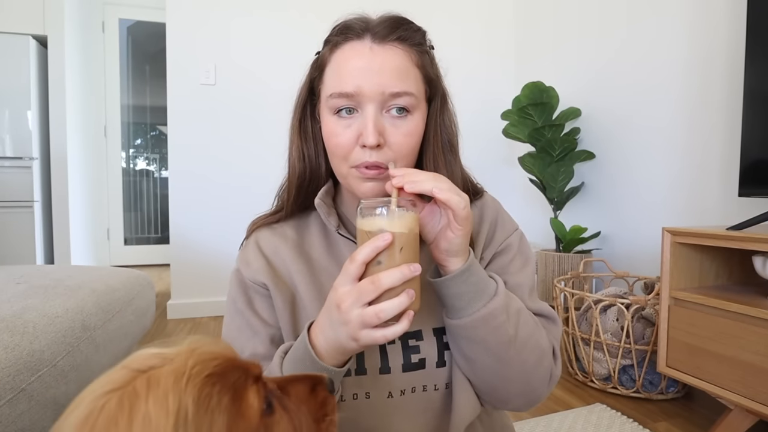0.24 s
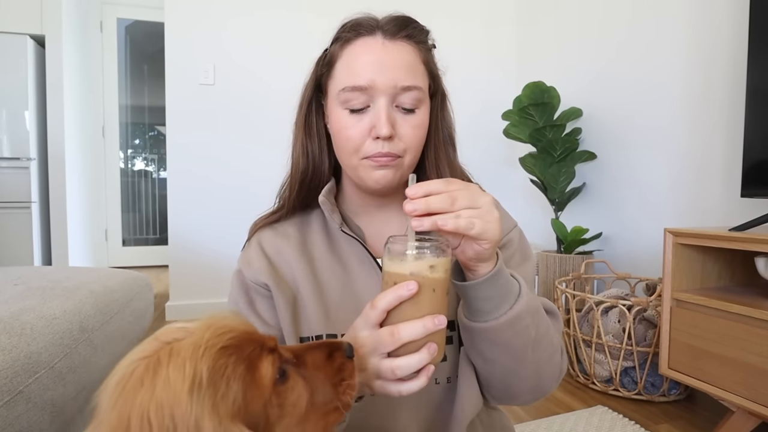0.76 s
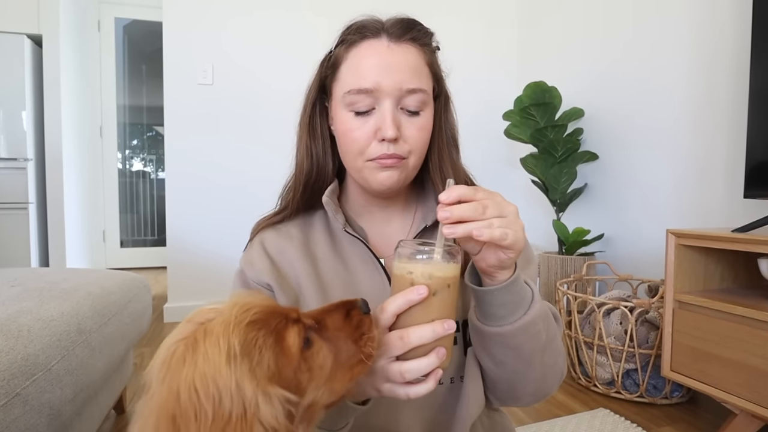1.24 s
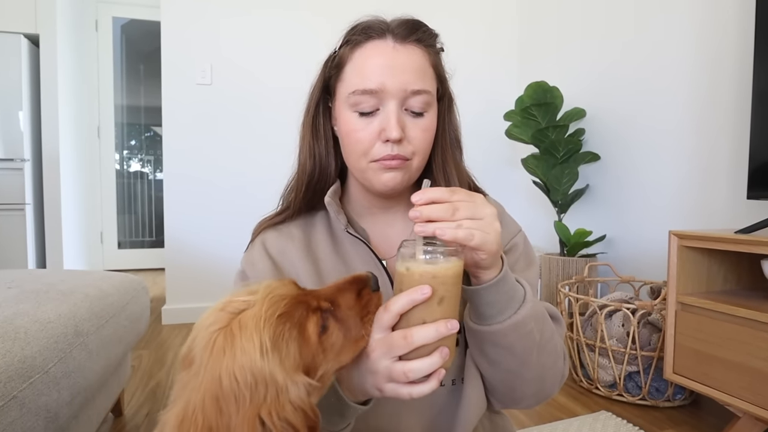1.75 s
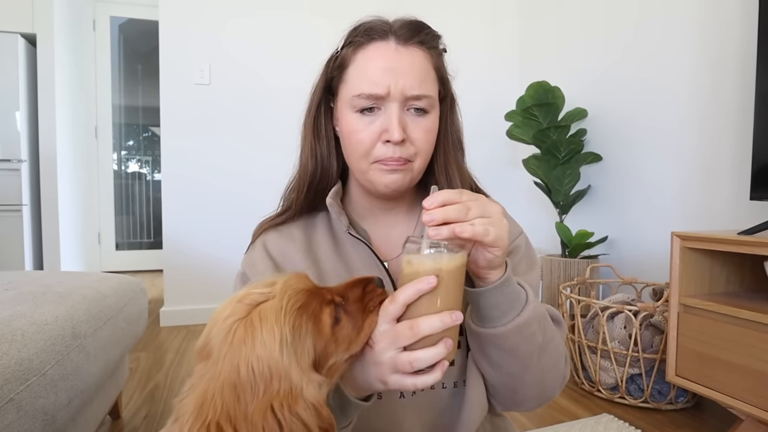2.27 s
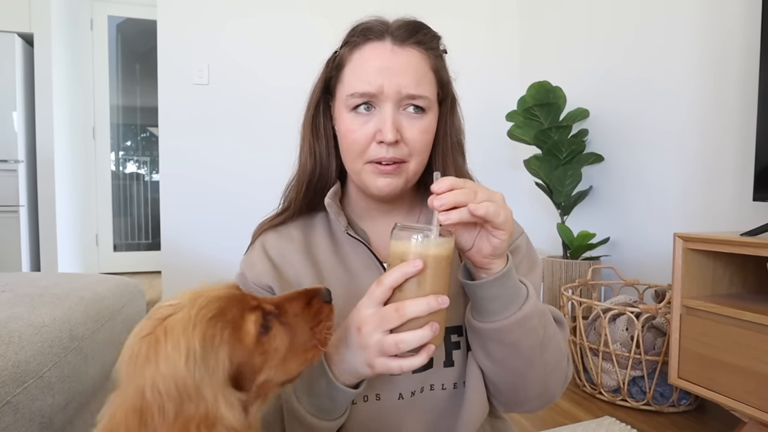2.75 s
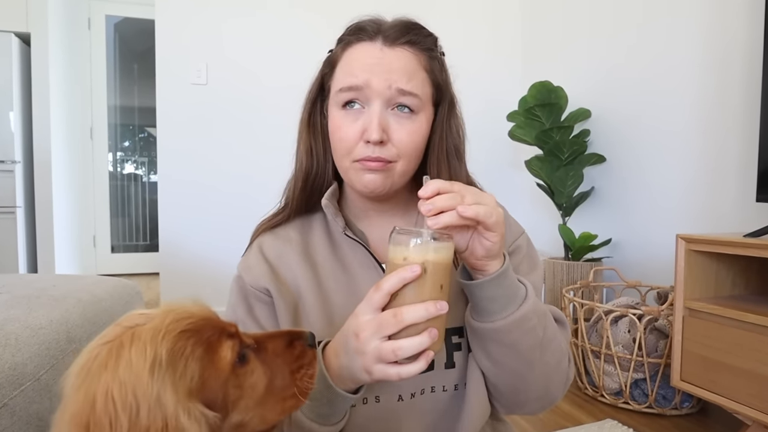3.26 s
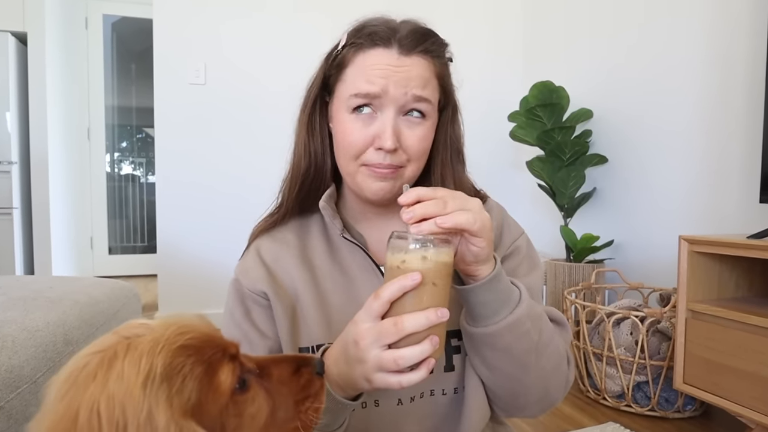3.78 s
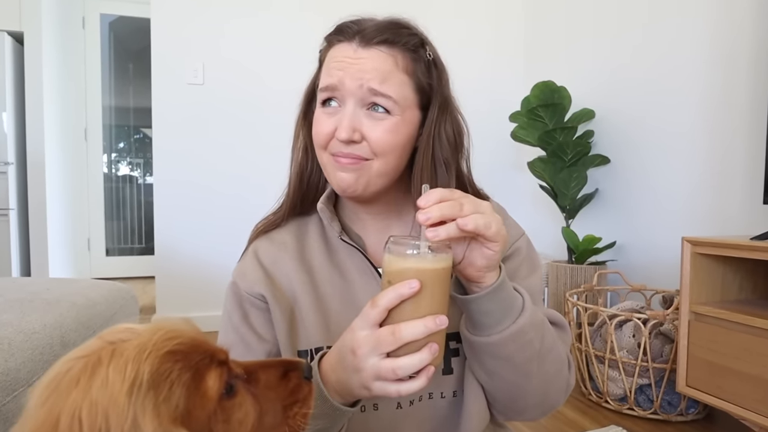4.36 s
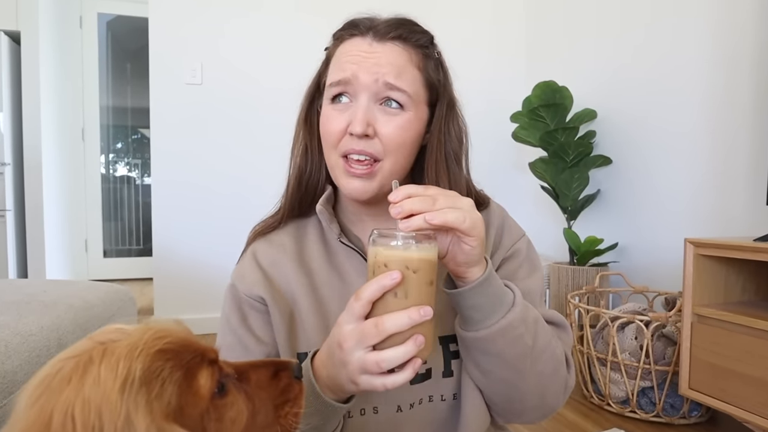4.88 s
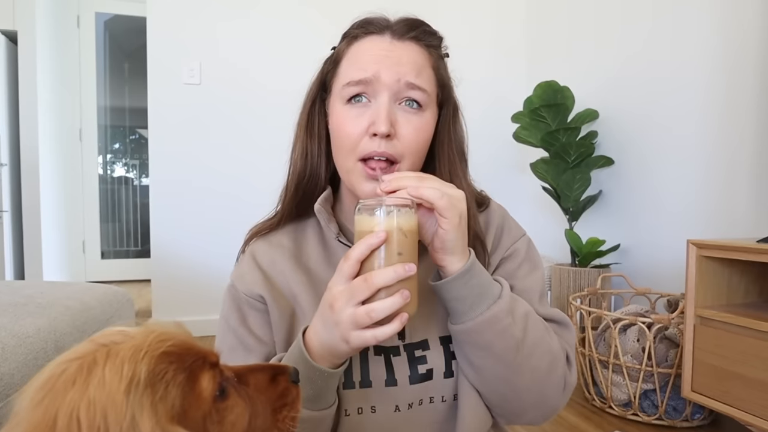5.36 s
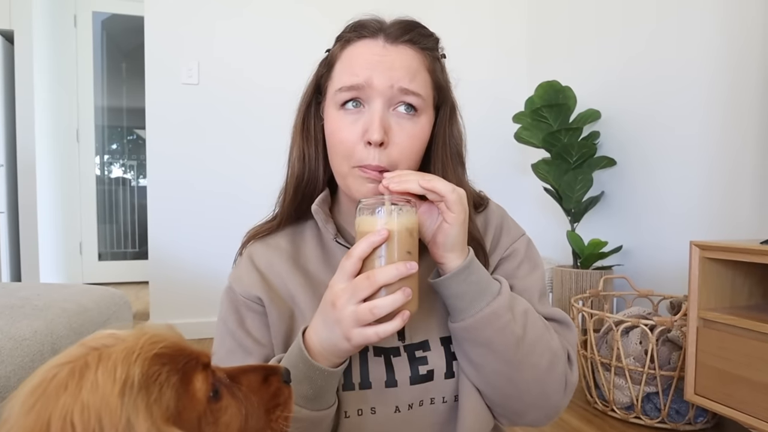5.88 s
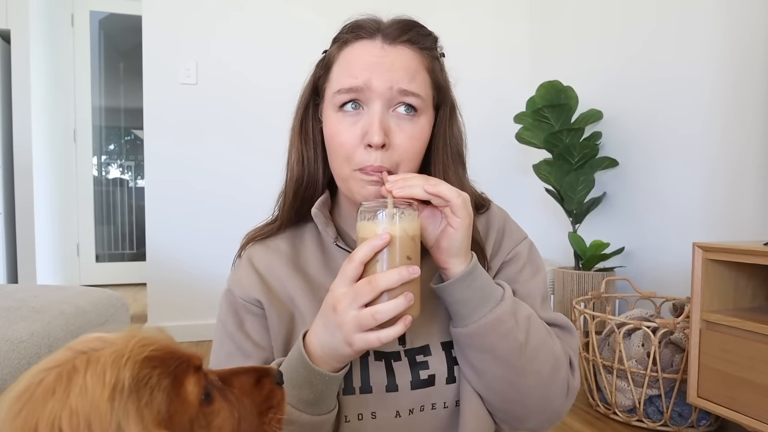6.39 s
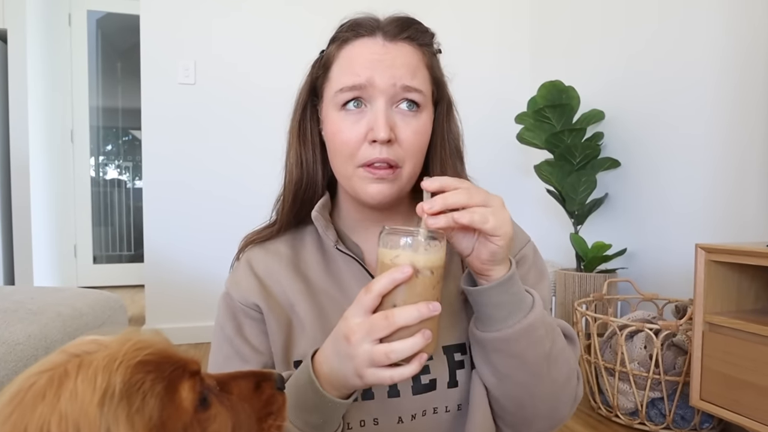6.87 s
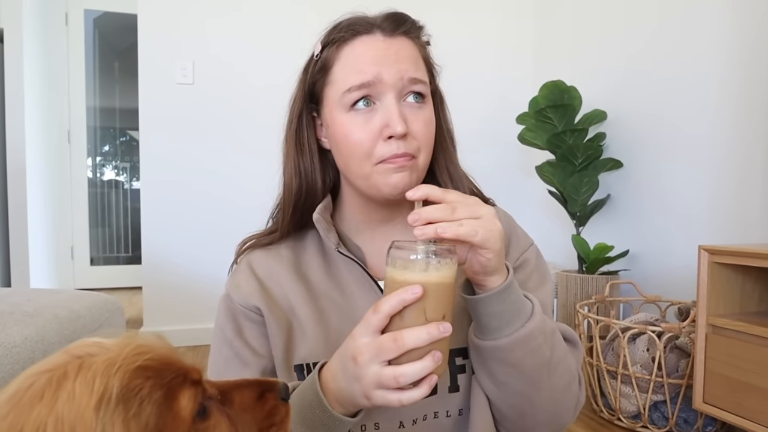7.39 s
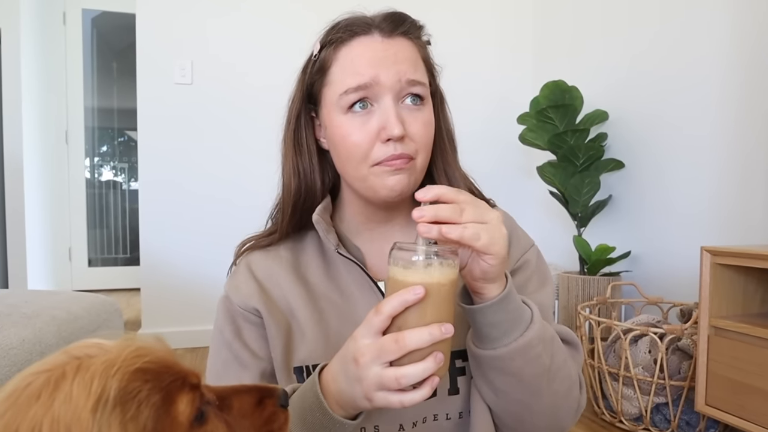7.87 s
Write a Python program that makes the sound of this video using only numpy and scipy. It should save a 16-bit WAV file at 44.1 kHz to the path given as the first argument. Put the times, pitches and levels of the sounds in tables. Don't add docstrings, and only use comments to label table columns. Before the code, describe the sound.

In a quiet living room, an iced drink is stirred close to the microphones. Cubes knock the glass and one another with short bright cracks over a dull, quickly damped ring, while little ticks and slides fill the gaps. The stirring is busy until nearly five seconds, almost stops, then returns in lively bursts. Now and then one clear note rings out. Soft air hiss, a faint far motor hum and one gentle paw step lie underneath.

```python
import sys
import numpy as np
from scipy import signal
from scipy.fft import rfft, irfft, next_fast_len
from scipy.io import wavfile

SR = 44100
rng = np.random.default_rng(int(sys.argv[2]) if len(sys.argv) > 2 else 0)


def boost_factor(decibels):
    exponent = np.asarray(decibels, float) / 20
    return 10 ** exponent


def transcribe(signal):
    frames = np.atleast_2d(signal).T
    limited = np.clip(frames, -1, 1)
    pcm = np.round(limited * 32767).astype(np.int16)
    wavfile.write(sys.argv[1], SR, pcm)


N = 358647


def rms_one(x):
    return x / np.sqrt(np.mean(x ** 2) + 1e-20)


def in_time(rows):
    s, *columns = np.transpose(rows)
    return [np.interp(np.arange(N) / SR, s, c) for c in columns]


def at_hz(points, hz):
    point_hz, value = np.array(points).T
    return np.interp(np.log(hz + 1e-9), np.log(point_hz), value)


def add(out, times, sounds):
    for s, sound in zip(times, sounds):
        i = max(round(s * SR), 0)
        out[..., i:i + sound.shape[-1]] += sound[..., :N - i]
    return out


def struck(hz, t60, rise_s, size=2600):
    t = np.arange(size) / SR
    onset = (1 - np.exp(-t / rise_s)) ** 2
    shape = onset * boost_factor(-60 * t / np.abs(t60)[..., None])
    sine = np.sin(2 * np.pi * np.minimum(hz, .45 * SR)[..., None] * t)
    return shape * sine / shape.max(-1, keepdims=True)


def cluster(modes, luck, cycles, rise_s, tilt_db=0):
    hz, db = np.transpose(modes)
    strength, detune, damp = np.split(luck, 3, axis=1)
    hz = hz * np.exp(0.049 * detune)
    rings = struck(hz, cycles / hz * np.exp(.3 * damp), rise_s, size=1400)
    signed = boost_factor(db + tilt_db + 2.3 * strength) * np.sign(detune)
    sound = (signed[..., None] * rings).sum(1)
    return sound / np.abs(sound).max(-1, keepdims=True)


# (frequency [Hz], density [dB per Hz])
AIR = [(20, -15), (171, -4), (382, -5), (700, -11), (2270, -15), (5850, -26.5), (11400, -36.5),
       (15500, -40)]
# (frequency [Hz], left-right correlation [-1..1])
LIKENESS = [(60, 1), (180, 0.18), (550, -0.12), (1650, -0.94), (4970, -0.88), (15000, 0.022)]
AIR_DB = -46


def air():
    size = next_fast_len(N)
    hz = np.arange(size // 2 + 1) * SR / size
    alike = np.clip(at_hz(LIKENESS, hz), -.9, .99)
    mid, side = rfft(rng.standard_normal((2, size)))
    both = np.sqrt(1 + alike) * mid + np.sqrt(1 - alike) * side * [[1], [-1]]
    shaped = both * boost_factor(at_hz(AIR, hz)) * (hz > 15)
    return boost_factor(AIR_DB) * rms_one(irfft(shaped, size)[:, :N])


# (time [s], level [dB])
HUM = [
    (0.0, -62),
    (2.35, -48.5),
    (2.47, -56.5),
    (4.94, -61),
    (6.41, -67.5),
    (6.97, -49.5),
    (7.38, -62.5),
    (8.06, -52.5),
]


def hum(hz=72, width_hz=4.2):
    sos = signal.butter(2, [hz - width_hz, hz + width_hz], "band", fs=SR, output="sos")
    return boost_factor(in_time(HUM)[0] - 3) * rms_one(signal.sosfilt(sos, rng.standard_normal(N)))


# (time of most motion [s], level [dB], settling [dB per s])
PUSHES = [(.38, -38.5, 123), (.64, -39.5, 43), (.97, -39, 61), (1.19, -32, 121), (1.4, -37, 122),
          (1.54, -39.5, 9), (1.84, -45, 151), (2.098, -35, 175.5), (2.37, -32.5, 82.5), (2.6, -44, 66),
          (2.73, -43.5, 68), (2.953, -33.5, 77), (3.12, -44.5, 65), (3.428, -30.5, 189),
          (3.68, -39.5, 51.5), (3.8, -34, 68.5), (3.998, -36, 150), (4.219, -35, 110), (4.4, -41, 133),
          (4.56, -33.5, 34), (6.742, -48, 0), (7.0, -44.5, 46), (7.22, -33, 54), (7.57, -41.5, 60),
          (7.941, -36, 18), (8.13, -25, 41)]
PUSH_DB_PER_S, DRIFT_DB = 214.5, -56.5


def motion_db():
    t = np.arange(0, N / SR + .01, .002)
    s, db, settle = np.transpose(PUSHES)[:, :, None]
    fall_db = np.where(t < s, PUSH_DB_PER_S * (s - t), np.abs(settle) * (t - s))
    power = boost_factor(DRIFT_DB) ** 2 + (boost_factor(db - fall_db) ** 2).sum(0)
    return np.interp(np.arange(N) / SR, t, 10 * np.log10(power))


def ticks(modes, dealt, clicks, cycles, colour_db):
    places = dealt.max() + 1
    luck = rng.standard_normal((places, 3 * len(modes))) * colour_db
    rings = cluster(modes, luck, cycles, rise_s=0.00047)
    return rms_one(sum(signal.oaconvolve(clicks * (dealt == k), ring)[:N] for k, ring in enumerate(rings)))


# (frequency [Hz], level [dB])
GLASS = [(640, -23), (790, -7), (930, -5), (1050, -10), (1320, -1), (1550, 1), (1740, -2.5)]
# (frequency [Hz], level [dB])
ICE = [(2150, -16), (2550, -2.5), (3000, -3.5), (3350, 0.5), (3750, -3.5), (4300, -6), (4800, 0),
       (5400, -4), (6100, -3), (7100, -1.5)]


def jostle(per_s=300, size_db=3.0, clumping_db=4.0):
    busy = np.interp(np.arange(N), np.linspace(0, N, num=500), rng.standard_normal(500))
    born = rng.random(N) < per_s * boost_factor(clumping_db * busy) / SR
    clicks = born * boost_factor(size_db * np.minimum(rng.exponential(1, N), 4))
    dealt = rng.integers(0, 14, N)
    dull = ticks(GLASS, dealt, clicks, cycles=17.6, colour_db=1.88)
    ice = ICE + [(9000, 2.0), (11000, 9.7)]
    bright = ticks(ice, dealt, clicks * boost_factor(rng.normal(0, 4.2, N)), cycles=30.0, colour_db=1.88)
    blunt = signal.butter(2, 4500, fs=SR, output="sos")
    bright = signal.sosfilt(blunt, bright)
    return boost_factor(motion_db() - 3.0) * (dull + bright)


# (time [s], peak level [dB], loudest frequency [Hz])
NUDGES = [(0.32, -34, 4460), (0.333, -32, 1530), (0.3564, -36, 1650), (0.369, -54, 1220),
          (0.3804, -32, 1630), (0.397, -34, 3500), (0.4226, -33, 1450), (0.5614, -33.5, 1730),
          (0.614, -29, 1590), (0.6402, -29.5, 1540), (0.7058, -21.5, 1277), (0.716, -24.5, 1650),
          (0.7813, -22.5, 1450), (0.8023, -23.5, 1390), (0.8931, -42.5, 2430), (0.939, -30.5, 2860),
          (0.963, -20, 3370), (1.0146, -28, 3510), (1.034, -28, 2100), (1.0481, -31.5, 1000),
          (1.066, -31.5, 3430), (1.106, -28.5, 1430), (1.122, -28, 3410), (1.2166, -23, 1600),
          (1.2541, -32.5, 967), (1.2809, -26, 1520), (1.3515, -40, 1610), (1.387, -30, 1240),
          (1.394, -27, 1320), (1.5449, -19.5, 2240), (1.5987, -24.5, 1760), (1.6643, -30, 1960),
          (1.673, -36, 1090), (1.692, -25, 1420), (1.706, -27.5, 2500), (1.753, -23.5, 2620),
          (1.7753, -23.5, 1440), (1.8484, -30.5, 1340), (2.007, -17, 1570), (2.0285, -23, 1380),
          (2.0332, -22.5, 1500), (2.066, -20, 1240), (2.0844, -23.5, 2570), (2.263, -32.5, 2520),
          (2.282, -24, 1325), (2.2933, -21, 1510), (2.321, -20.5, 1510), (2.341, -31, 1530),
          (2.3856, -20.5, 2430), (2.3976, -19, 1217), (2.4367, -37, 3610), (2.4535, -36, 4950),
          (2.5765, -41, 1740), (2.583, -20.5, 1660), (2.6627, -29, 1580), (2.7046, -24.5, 3520),
                 (2.711, -22, 1580), (2.7236, -23, 5380), (2.7612, -27, 1880), (2.8557, -38.5, 910),
                 (2.8881, -28, 1620), (2.9225, -37, 1610), (2.9293, -34, 990), (2.9674, -29.5, 1240),
                 (2.977, -19, 1320), (3.01, -22, 3370), (3.0563, -21, 1290), (3.0678, -20, 1750),
                 (3.1337, -21, 1630), (3.153, -26, 1600), (3.2257, -31, 3600), (3.266, -42, 1350),
                 (3.2732, -37, 940), (3.361, -22, 1680), (3.383, -22.5, 1350), (3.4245, -17, 1400),
                 (3.42, -16, 5270), (3.4647, -32, 1520), (3.4778, -32, 2310), (3.595, -25, 3500),
                 (3.64, -26, 5030), (3.6954, -24, 1250), (3.6994, -26.5, 2900), (3.756, -36, 1600),
                 (3.766, -37, 1270), (3.7977, -18.5, 1250), (3.8649, -29, 3600), (3.9266, -26, 1570),
                 (3.9388, -19, 1500), (3.9514, -16, 2470), (3.986, -18, 1610), (4.0133, -17.5, 1580),
                 (4.166, -24, 1220), (4.213, -45, 1660), (4.253, -27.5, 1510), (4.3122, -30, 860),
                 (4.346, -30, 1260), (4.472, -29, 3310), (4.5359, -17, 1460), (4.5784, -25, 3040),
                 (4.638, -29, 1440), (4.661, -19, 3260), (4.6804, -21, 1600), (4.694, -16.5, 3470),
          (4.731, -27.0, 1700), (4.74, -18, 1490), (4.8025, -19.5, 4770), (4.8336, -19, 4900),
               (5.058, -32, 1680), (5.127, -41, 1490), (5.1813, -49.5, 4170), (5.6639, -38, 3220),
               (5.7277, -31, 1030), (5.8694, -38, 1260), (6.467, -37, 860), (6.5788, -34.5, 920),
               (6.7237, -29.5, 1270), (6.776, -24, 5500), (6.8349, -28.5, 1750), (6.889, -33, 3150),
               (6.8983, -27, 4450), (6.9274, -28.5, 824), (6.945, -32, 1860), (6.9641, -30, 1570),
               (7.0132, -24, 7550), (7.1265, -28, 3200), (7.199, -17.5, 4500), (7.2165, -16, 1520),
               (7.2204, -29, 1450), (7.238, -20, 1320), (7.2646, -36, 3200), (7.2848, -17.5, 5300),
               (7.389, -20.5, 1650), (7.4415, -35, 5320), (7.4687, -21, 1550), (7.4834, -23, 1460),
               (7.5323, -29, 1550), (7.546, -26.0, 1630), (7.58, -19.5, 1630), (7.5936, -26, 3780),
               (7.622, -30, 1780), (7.6599, -33, 3170), (7.6753, -26.5, 1564), (7.7445, -31, 1570),
               (7.776, -27, 1580), (7.8887, -35, 1550), (7.9174, -35, 3230), (7.932, -23, 1640),
               (7.952, -18.5, 820), (7.9606, -24, 820), (8.021, -21, 1550), (8.0328, -17.5, 1440),
               (8.0693, -36, 1570), (8.0932, -29, 1540), (8.0987, -25, 1410), (8.1134, -18, 1460)]
# (time [s], peak level [dB], loudest frequency [Hz])
REBOUNDS = [
    (1.525, -15, 1870),
    (1.538, -21, 1900),
    (3.097, -22, 1520),
    (4.881, -21.5, 1500),
    (5.029, -27, 2910),
    (6.8638, -21, 4740),
    (3.9845, -13.5, 7600),
]


def nudges():
    s, db, hz = np.transpose(NUDGES + REBOUNDS)[:, :, None]
    modes = GLASS + [(f, level_db + 8.5) for f, level_db in ICE]
    luck = rng.standard_normal((len(s), 52))
    octaves = np.log2(np.array(modes)[:, 0] / hz)
    near_db = -5.0 * np.abs(octaves) - 2.7 * np.maximum(octaves, 0)
    spread = cluster(modes, luck[:, :51], cycles=9.5, rise_s=0.00094, tilt_db=near_db)
    own_note = struck(hz[:, 0], 16.0 / hz[:, 0], 0.0011, size=1400)
    mix = boost_factor(db + 0.5) * (0.7 * spread + 0.44 * own_note)
    pan_db = 0.98 * luck[:, 51:, None] * [[.5], [-.5]]
    return np.array([add(np.zeros(N), s[:, 0], mix * boost_factor(pan_db[:, k])) for k in range(2)])


# (time [s], crack peak
# level [dB], crack frequency [Hz], body level over crack [dB], top level over crack [dB])
KNOCKS = [(0.4042, -35, 3440, -16, -7), (0.4454, -22.5, 3300, -16, -32),
          (0.623, -22.5, 2050, -23.5, -18), (0.6486, -32, 2300, 2, -6.5),
          (0.7703, -28.5, 2530, -12.5, -15), (0.809, -27.5, 4000, -4.5, -10.5),
          (0.9564, -28, 2650, 0, -37), (0.9669, -23.5, 3370, -4, -29), (0.9858, -37.5, 3410, 9.5, -33),
          (1.0232, -29, 2100, 0, -41), (1.0725, -23, 3460, -12, -47), (1.174, -31.5, 3000, 3, -27.5),
          (1.1824, -16, 3340, -14, -23.5), (1.1986, -33.5, 3310, -3.5, -29),
          (1.2347, -20.5, 2700, -6.5, -24), (1.4009, -20.5, 2720, -12, -31.5),
          (1.416, -24, 3550, -9.5, -19), (1.4657, -26, 3740, 1.5, -15.5),
          (1.5006, -23.5, 3280, -3.5, -26), (1.516, -4.5, 6300, -7, -3.5),
          (1.559, -14, 5400, -20, -14.5), (1.7217, -1, 5660, -23, -11),
          (1.7316, -16, 5500, -21, -14.5), (1.8056, -36, 2280, 14, -9),
          (1.9573, -13.5, 5000, -9.5, -37), (1.9853, -25, 3150, -1, -7.5),
               (2.0797, -18, 2620, -20, -11), (2.088, -12.5, 5230, -17.5, -31),
               (2.105, -15, 5630, -10, -16), (2.1184, -18, 3970, -32, -21), (2.2379, -35.5, 2580, 8.5, -41),
               (2.2878, -26.5, 3440, -18.5, -36), (2.3494, -21, 3470, 4, -11),
               (2.3509, -20.5, 2460, -7.5, -22), (2.3792, -14.5, 5000, -6, -24),
               (2.4091, -17, 3230, -9, -14.5), (2.4694, -12.5, 5250, -17, -19),
               (2.497, -25, 2420, 0.5, -40), (2.5301, -24, 3560, -28, -44), (2.5905, -25.5, 2000, 0, -27),
               (2.6347, -26.5, 2390, -19, -12), (2.717, -25, 1840, -15, -6),
               (2.7761, -21, 5160, -12.5, -18), (2.87, -30, 2220, -6, -47), (2.9342, -9.5, 3270, -13, -19),
               (2.9457, -12.5, 4800, -12.5, -48), (2.9583, -20, 2800, -5, -27),
               (2.9984, -17, 3340, -4.5, -22),
          (3.0848, -17.5, 3200, 2, -26), (3.105, -25, 2180, -5, -38), (3.1181, -27.5, 3030, 4, -43),
              (3.186, -28.5, 2730, -2.5, -43), (3.29, -20.5, 2480, -6, -38), (3.3118, -26.5, 3070, -3, -20),
              (3.348, -23, 3410, -7, -18), (3.3947, -15, 3320, -7.5, -9.5), (3.4288, -8.5, 5400, -7.5, -16),
              (3.5577, -44, 3480, -11, 15), (3.6119, -29.5, 3470, -6, -16),
              (3.6467, -17.5, 2760, -3.5, -12), (3.663, -23.5, 2870, -5, -28), (3.679, -15, 4310, -15, -37),
              (3.734, -30.5, 2030, 4.5, -20), (3.7837, -25.5, 2980, 0, -21), (3.808, -17, 3100, -12.5, -16),
              (3.8533, -25.5, 3300, 1, -30), (3.912, -28.5, 3380, 1.5, -19), (3.9574, -3.5, 3910, -16, -14),
              (4.0095, -17, 2400, -29, -13), (4.052, -16, 4020, -15, -18), (4.2214, -24, 3200, -5.5, -32),
              (4.365, -21, 4430, -15, -38),
          (4.383, -15, 4810, -7, -24), (4.4953, -14.5, 2980, -7.5, -22.5), (4.503, -22, 3680, -8, -26),
             (4.5206, -16.5, 3170, -8.5, -26), (4.5436, -25, 3200, -1.5, -34),
             (4.605, -15.5, 2950, -8, -36), (4.6205, -23, 2570, -4.5, -36), (4.6473, -18.5, 3370, -5, -22),
             (4.6698, -15.5, 3140, -11, -19.5), (4.668, -30, 3250, -18.5, -39),
             (4.7586, -18.5, 2530, -6.5, -24), (4.7672, -26, 2770, -3.5, -28),
             (4.781, -11, 3930, -9.5, -14), (4.8369, -21, 2750, -5, -4.5), (4.8576, -1.5, 4820, -19, -21),
             (4.8714, -23, 3100, 2, -28), (5.197, -27, 3330, -33, -20), (5.249, -36.5, 2230, 8, -39),
             (5.476, -15.5, 3090, -13.5, -19.5), (5.4925, -25.5, 3350, -1.5, -53),
             (5.688, -41, 2030, 12, -20), (5.7843, -30, 3000, -4, -28), (5.88, -30, 3560, -19, -47),
             (6.0524, -31, 3800, -1.5, -33),
          (6.6855, -32, 3220, -11, -13), (6.7697, -20.5, 3400, -11, -10.5),
              (6.8607, -14.5, 4700, -13, -37), (6.984, -22, 3740, -4.5, -31), (7.0156, -28, 2070, 2, -8),
              (7.0708, -23, 4700, -15, -41), (7.139, -26, 3150, -3.5, -18), (7.1534, -18, 3490, -14, -24),
              (7.195, -21.5, 3760, -8, -35), (7.2098, -23, 3280, 0.5, -24), (7.2249, -21, 3500, -1, -18),
              (7.252, -20, 2500, -14, -31), (7.2785, -12.5, 2400, -11, -28),
              (7.2897, -1.5, 4120, -17.5, -12.5), (7.454, -24, 2980, -14, -40),
              (7.559, -25.5, 3330, 0, -19), (7.5712, -27.5, 3250, -9, -31.5), (7.6933, -30, 3220, -6, -52),
              (7.8031, -44, 3300, 14.5, -1.5), (7.937, -22.5, 2950, -12, -25),
              (7.9825, -13.5, 2300, -5.5, -15), (8.0005, -15.5, 3120, -5, -37),
              (8.0435, -15.5, 3090, -4.5, -19), (8.1191, -17, 2420, -8, -19)]
LONE_TICKS = [
    (1.4531, -35, 3510, -11, -34.5),
    (5.258, -32.5, 1920, -6.5, -36),
    (5.3244, -35, 3400, -5, -11.5),
    (5.6018, -34.5, 1940, -2.5, -37),
    (5.6188, -32, 2930, -4, -39),
    (5.7047, -32, 3220, -4.5, -16),
    (5.7151, -30.5, 3800, -9, -17),
    (5.9521, -35.5, 2700, -1, -51),
]


def knocks():
    rows = KNOCKS + LONE_TICKS
    s, db, hz, body_db, top_db = np.transpose(rows)[:, :, None]
    luck = rng.standard_normal((len(s), 67))
    near_db = (-4.5 + 0.1 * db) * np.abs(np.log2(np.array(ICE)[:, 0] / hz))
    crack = cluster(ICE, luck[:, :30], cycles=18.2, rise_s=0.00017, tilt_db=near_db)
    own_note = struck(hz[:, 0], 17.8 / hz[:, 0], 0.00016, size=1400)
    snap = np.diff(rng.standard_normal((len(s), 1401))) * boost_factor(-60 * np.arange(1400) / SR / 0.01)
    crack = .5 * crack + 0.37 * own_note + boost_factor(-32.0) * snap
    body = cluster(GLASS, luck[:, 30:51], cycles=16.4, rise_s=0.00083)
    spray = [(8500, 9.0), (9500, 12.5), (10700, -3.0), (11800, 10.0), (13000, -36.5)]   # (Hz, dB)
    top = cluster(spray, luck[:, 51:66], cycles=12, rise_s=0.00037)
    rest = boost_factor(db + body_db + 2.5) * body + boost_factor(db + top_db + 9.5) * top
    mix = boost_factor(db + 7.5) * crack + rest
    even = cluster(ICE, .4 * luck[:, :30], cycles=6.0, rise_s=0.00038, tilt_db=.5 * near_db)
    pan_db = 0.86 * luck[:, 66:, None] * [[.5], [-.5]]
    lag = 1.2 * rng.standard_normal(len(s)) / SR
    arrive = s[:, 0] + .0003
    left = add(np.zeros(N), arrive + .5 * lag, mix * boost_factor(pan_db[:, 0]))
    right = add(np.zeros(N), arrive - .5 * lag, mix * boost_factor(pan_db[:, 1]))
    return left, right, add(np.zeros(N), s[:, 0], boost_factor(db + 4.0) * even + rest)


# (time [s], peak level [dB], frequency [Hz])
THUDS = [
    (1.056, -33.5, 400),
    (1.088, -27, 404),
    (1.097, -36.5, 193),
    (1.107, -32, 465),
    (1.122, -33, 478),
]


def thuds():
    s, db, hz = np.transpose(THUDS)
    sounds = struck(hz, 8.0 / hz, 0.003)
    sounds = sounds + 0.4 * struck(hz * 1.6, 9.0 / hz, 0.0033)
    sounds = sounds + 0.3 * struck(hz * 0.5, 6.5 / hz, 0.00163)
    return add(np.zeros(N), s - .002, boost_factor(db - 3.5)[:, None] * sounds)


# (time [s], peak level [dB], frequency [Hz])
NOTES = [
    (1.183, -20, 1300),
    (1.7217, -6, 2610),
    (1.7318, -17, 2550),
    (5.493, -24.5, 980),
    (5.4935, -23, 1750),
    (5.6885, -29.5, 906),
    (6.862, -23, 863),
    (7.0714, -26.5, 850),
    (7.2898, -4, 3740),
]
NOTE_CYCLES, NOTE_RISE_S = 20, .0004


def notes():
    s, db, hz = np.transpose(NOTES)
    return add(np.zeros(N), s, boost_factor(db)[:, None] * struck(hz, NOTE_CYCLES / hz, NOTE_RISE_S))


# (frequency [Hz], left over right [dB])
LEAN = [(60, -6), (150, 4), (380, 0.5), (2380, -5), (5980, -0.5), (15000, 3.5)]
# (frequency [Hz], left ahead of right [rad])
LEAD = [(1980, 0.22), (2930, 1.65), (8610, -1.5), (14100, -3.5)]


def ports(x):
    size = next_fast_len(N)
    hz = np.arange(size // 2 + 1) * SR / size
    half = boost_factor(at_hz(LEAN, hz) / 2) * np.exp(.5j * at_hz(LEAD, hz))
    return irfft(rfft(x, size) * np.array([half, 1 / half]), size)[:, :N]


def near_wall(near, late_s=0.0043, level_db=-18):
    return add(np.zeros((2, N)), [late_s], [boost_factor(level_db) * near[::-1]])


# (frequency [Hz], t60 [s], level [dB])
ROOM = [(300, .1, 2.5), (1500, 0.71, 4.5), (4000, 0.54, -2), (12100, 0.37, 1)]


def room(x, gap_s=0.0031):
    t, tail = np.arange(SR) / SR, 0
    hz_t60, hz_level = np.array(ROOM)[:, :2], np.array(ROOM)[:, ::2]
    for hz in 125 * 2 ** np.arange(0, 7.1, .5):
        sos = signal.butter(2, [hz / 2 ** .25, hz * 2 ** .25], "band", fs=SR, output="sos")
        band = signal.sosfilt(sos, rng.standard_normal((2, SR)))
        tail = tail + band * boost_factor(at_hz(hz_level, hz) - 60 * t / at_hz(hz_t60, hz))
    tail = tail * np.clip(t / gap_s - .3, 0, 1) * (1 + 0.94 * np.exp(-t / 0.014))
    tail = tail / np.sqrt(np.sum(tail ** 2) / 2)
    return signal.oaconvolve(x[None], tail, axes=1)[:, :N]


def scene():
    *close, around = knocks()
    rest = jostle() + thuds() + nudges()
    beamed = notes()
    near = close + rest + beamed
    furnishings = signal.butter(1, 9000, fs=SR, output="sos")
    soft = signal.sosfilt(furnishings, around + rest[0] + .5 * beamed)
    return ports(near) + near_wall(near) + boost_factor(-6.5) * room(soft) + air() + hum()


def low_pass(x):
    return signal.sosfilt(signal.butter(12, 16600, fs=SR, output="sos"), x)


def record(dry):
    capsules = signal.butter(6, 14000, fs=SR, output="sos")
    dull = signal.sosfilt(capsules, np.clip(dry, -.92, .92))
    return low_pass(dull)


dry = scene()
out = record(dry)
transcribe(out)
```